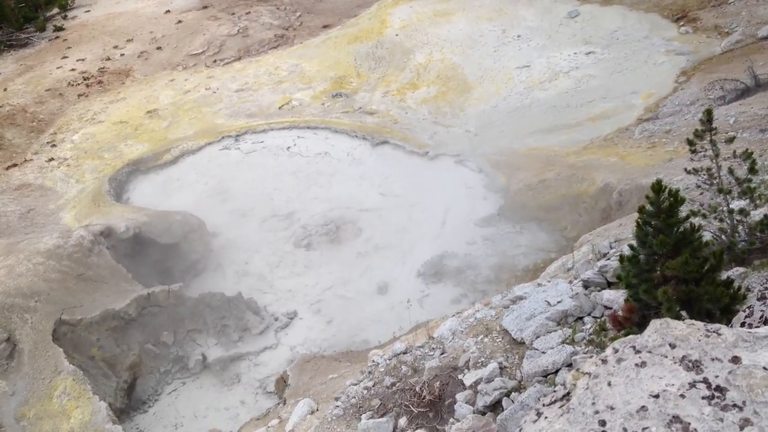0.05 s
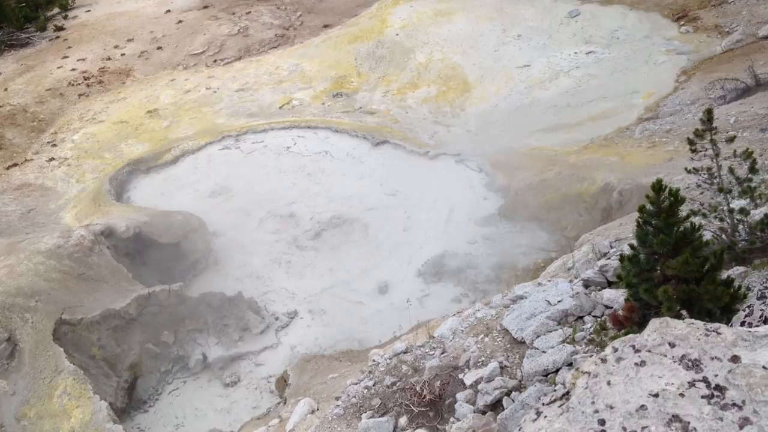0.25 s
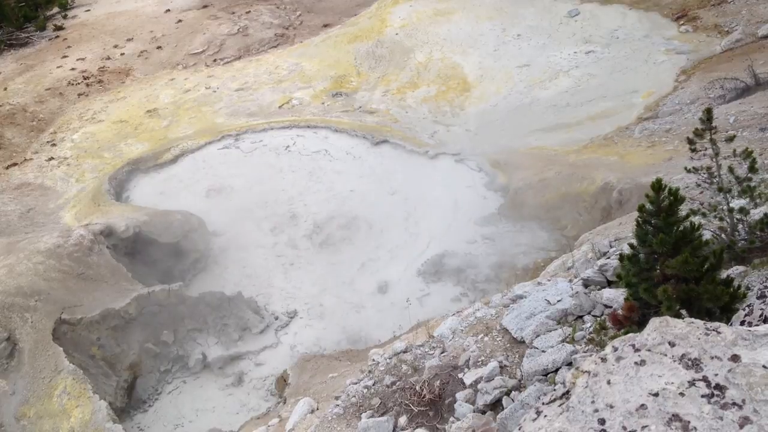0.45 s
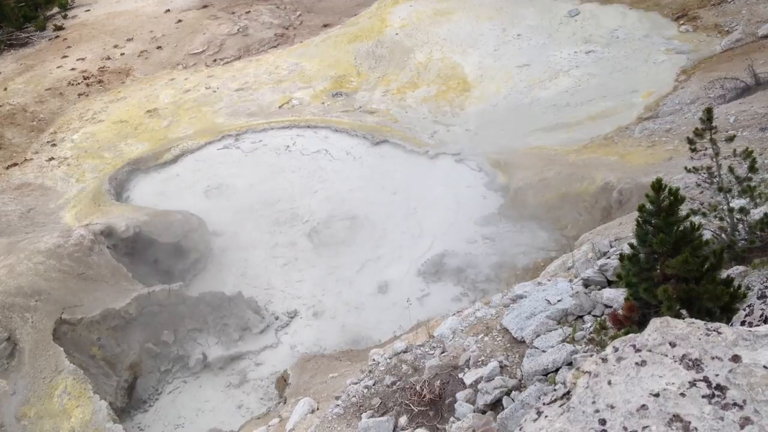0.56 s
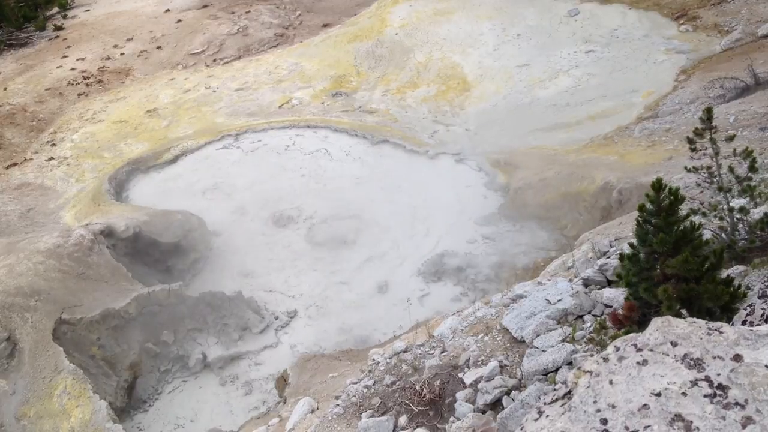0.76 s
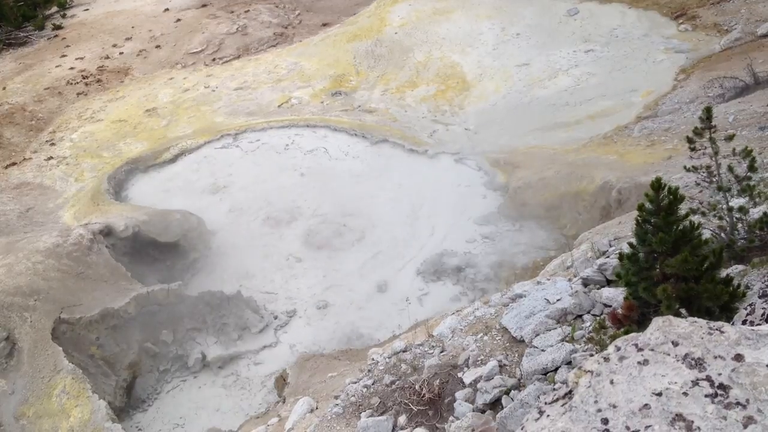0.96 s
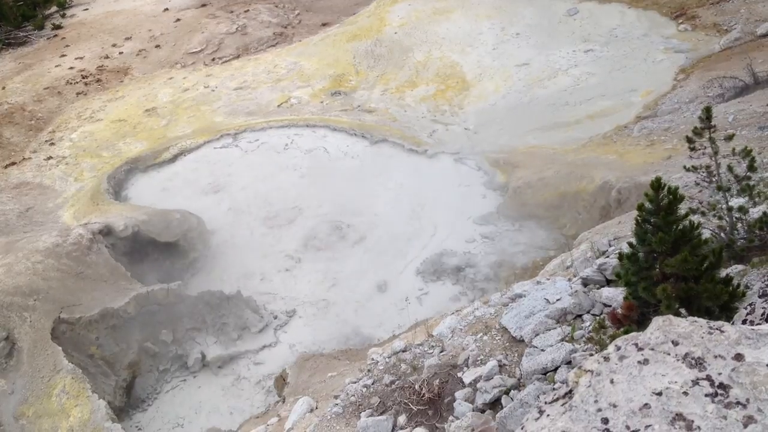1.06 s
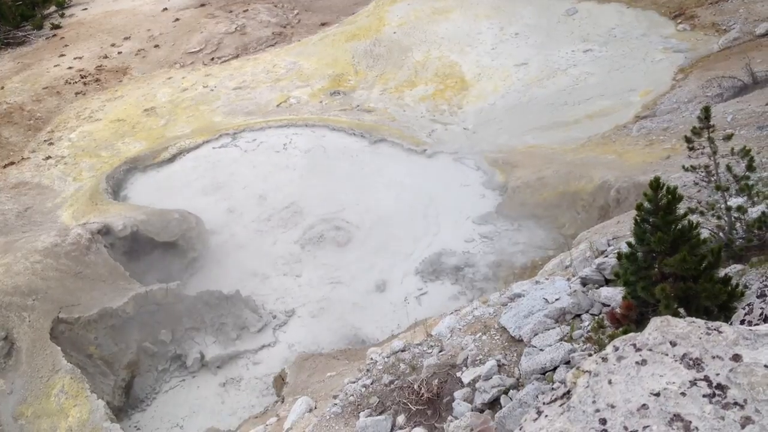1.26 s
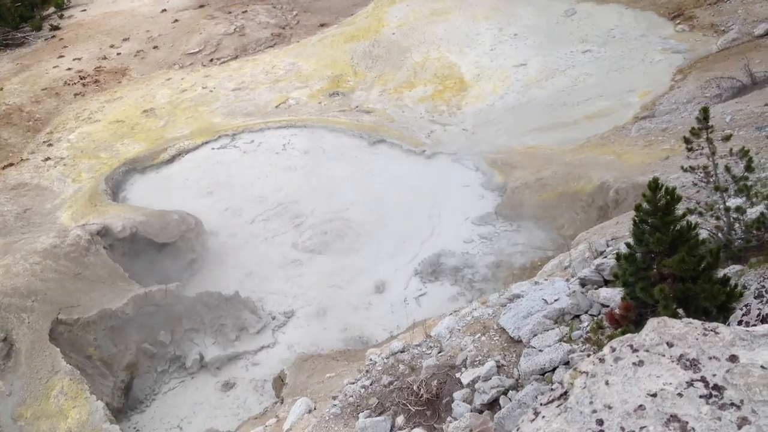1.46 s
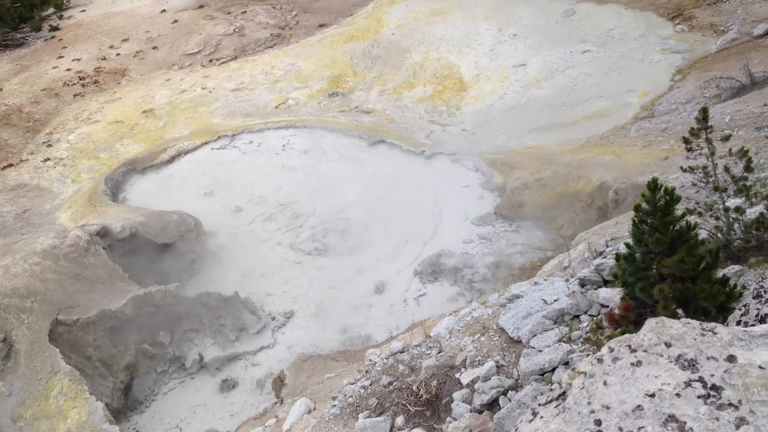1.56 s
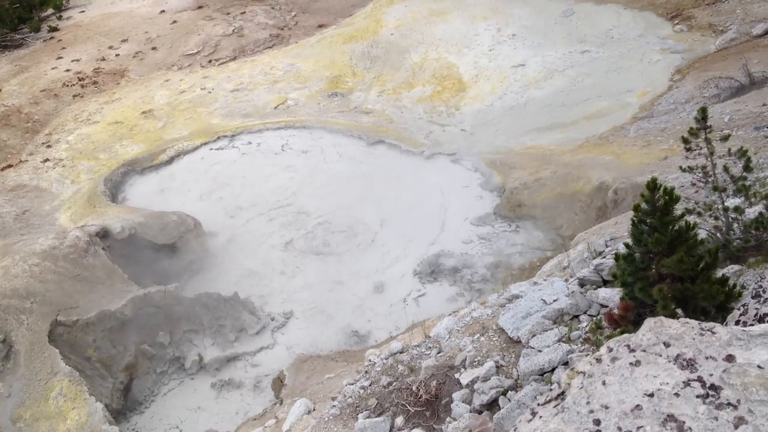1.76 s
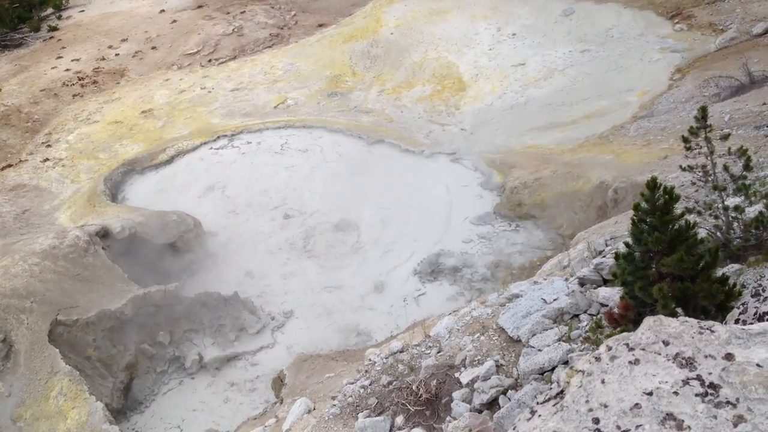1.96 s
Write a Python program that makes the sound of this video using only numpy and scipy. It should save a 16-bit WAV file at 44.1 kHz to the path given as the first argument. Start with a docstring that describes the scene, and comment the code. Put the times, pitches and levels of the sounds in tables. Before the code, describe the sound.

Low gulping and churning of a boiling mud pool, and one brief microphone bump.

```python
"""A muddy hot spring churns some way below a rim. Big gas bubbles gulp, each ringing briefly,
and hollows in the bank boom as the boiling rings them. The surface simmers evenly, with
churning water and small plops. The microphone is bumped once, with a faint rebound,
and its own hiss lies over the quiet scene."""
import sys
import numpy as np
from scipy import signal
from scipy.fft import irfft
from scipy.io import wavfile
from scipy.ndimage import uniform_filter1d

SR = 44100
rng = np.random.default_rng(int(sys.argv[2]) if len(sys.argv) > 2 else 0)


def unload_audio(sound):
    """Save the sound as a 16-bit wav file, at the path given as the first command line argument."""
    columns = np.transpose(np.atleast_2d(sound))
    # keep every value between -1 and 1, then stretch to whole-number steps
    steps = np.round(np.clip(columns, -1, 1) * 32767)
    wavfile.write(sys.argv[1], SR, steps.astype(np.int16))


N = 88200

# The tone of the microphone's hiss. Each row: frequency in Hz, relative level in dB.
HISS_TONE = [(100, -1.5), (2500, -0.5), (4000, 0), (6000, -2), (8000, -8), (9800, -16.5), (11500, -9),
             (13500, -0.5), (15300, -2)]
# A bump and its rebound. Each row: start in seconds, push in dB, brightness of the contact in Hz.
MIC_BUMPS = [(0.2029, -14.5, 530), (0.264, -27, 100)]
# The tone of churning water. Each row: frequency in Hz, relative level in dB.
CHURN_TONE = [(22, -37), (45, -32), (75, -11.5), (120, -2.5), (190, -1), (280, -1.5), (370, -8.5),
              (500, -10), (800, -15), (1300, -21), (2400, -31.5), (6000, -40.5)]
# The deep and the upper hollow. Each row: pitch in Hz, spread to either side in Hz, average level in dB.
BANK_HOLLOWS = [(171, 4.5, -65), (231.5, 10, -63)]
# How the booming swells. Each row: time in seconds, relative dB of the deep hollow, then of the upper.
HOLLOW_SWELLS = [(0, -2, -8.5), (.35, 2, -4), (.5, 0, -5.5), (.62, 1.5, 3.5), (.76, 1, -0.5), (.9, 1, 2),
                 (1.1, -3, -0.5), (1.28, 4.5, 5.5), (1.45, -6.5, 5.5), (1.59, 4.5, -7.5), (1.69, 3.5, 8.5),
                 (1.83, 4, -11), (2.0, -2.5, -7)]
# The loudest gulps. Each row: start in seconds, pitch in Hz, strength in dB.
LOUD_GULPS = [(0.282, 254, -50), (0.735, 174, -45.5), (0.796, 226, -43.5), (0.909, 269, -47),
              (1.282, 228, -51), (1.346, 282, -48), (1.513, 258, -44.5)]


def undb(db):
    """Turn decibels into a gain."""
    return 10 ** (np.asarray(db) / 20)


def level(x, db):
    """Set a sound's average (rms) level."""
    return x * undb(db) / np.sqrt(np.mean(x ** 2))


def frequencies():
    """The frequencies in Hz that make up the sound."""
    return np.maximum(np.arange(N // 2 + 1) * SR / N, 1)


def tone(points):
    """Join (Hz, dB) points into a gain for every frequency."""
    hz, db = np.array(points).T
    return undb(np.interp(np.log(frequencies()), np.log(hz), db))


def noise(gain):
    """Noise with the given gain at each frequency."""
    return irfft(gain * np.exp(2j * np.pi * rng.random(len(gain))), N)


def keep_side(x, hz, side, order):
    """Keep the "low" or "high" side of hz; a higher order cuts more steeply."""
    return signal.sosfilt(signal.butter(order, hz, side, fs=SR, output="sos"), x)


def wander(per_s):
    """A smooth random curve that typically strays by about 1."""
    hold = max(int(SR / per_s), 2)
    steps = rng.standard_normal(N)[np.arange(N) // hold]
    smooth = uniform_filter1d(uniform_filter1d(steps, hold), hold)
    return smooth / smooth.std()


def bubble(start, hz, cycles, rise):
    """A bubble swells, then fades as its pitch climbs by the share `rise`. Gives its place and sound."""
    at = np.arange(min(int(start * SR), N), min(int((start + cycles / hz) * SR), N))
    turns = np.arange(len(at)) * hz / SR
    loudness = np.minimum(turns, 1) * np.exp(-np.log(1000) * turns / cycles)  # fades by 60 dB
    return at, loudness * np.sin(2 * np.pi * turns * (1 + rise * turns / cycles / 2))


def bubbles(per_s, middle_hz, octaves, cycles, rise, scatter_db):
    """Bubbles of random size ring at random moments; the lower ones are louder."""
    out = np.zeros(N)
    starts = np.cumsum(rng.uniform(0, 2, size=2000)) / per_s
    chance = np.clip(rng.standard_normal(size=(2000, 2)), -2, 2)
    for start, (pitch, strength) in zip(starts, chance):
        if start * SR >= N:
            break
        hz = middle_hz * 2 ** (octaves * pitch)
        at, ring = bubble(start, hz, cycles, rise)
        out[at] += ring * undb(scatter_db * strength) * np.sqrt(middle_hz / hz)
    return out


def microphone_hiss():
    """The microphone makes its own steady hiss."""
    return level(noise(tone(HISS_TONE)), db=-76)


def microphone_bumps():
    """Each bump is one short push on the microphone, dulled by a soft contact."""
    push_s, swing_hz, bass_cut_hz, casing_hz = 0.0012, 137, 132, 2320
    out = np.zeros(N)
    for start, db, contact_hz in MIC_BUMPS:
        t = np.maximum(np.arange(N) / SR - start, 0)
        push = t / push_s * np.exp(1 - t / push_s) * np.cos(2 * np.pi * swing_hz * t)
        out -= undb(db) * keep_side(push, contact_hz, "low", order=1)
    thumps = keep_side(out, bass_cut_hz, "high", order=6)  # leaves a few cycles that fall in pitch
    return keep_side(thumps, casing_hz, "low", order=2)  # the casing carries little treble


def churning_water():
    """Churning water makes a rushing noise in which each octave flickers on its own."""
    flicker_db = 1.0
    octaves = np.log2(frequencies())
    out = np.zeros(N)
    for middle in range(4, 15):
        band = np.sqrt(np.maximum(1 - abs(octaves - middle), 0))
        out += noise(tone(CHURN_TONE) * band) * undb(flicker_db * wander(per_s=28))
    return level(out, db=-60.5)


def small_plops():
    """Small bubbles plop at the surface, each sliding up in pitch."""
    plops = bubbles(per_s=320, middle_hz=644, octaves=0.65, cycles=14, rise=0.29, scatter_db=1)
    return level(plops, db=-77)


def booming_hollows():
    """The boiling rings two hollows in the bank, which boom in turns, each at its own pitch."""
    times, *swells = np.array(HOLLOW_SWELLS).T
    out = np.zeros(N)
    for (hz, width, db), swell_db in zip(BANK_HOLLOWS, swells):
        ring = noise(1 / (1 + ((frequencies() - hz) / width) ** 2))
        swell = undb(np.interp(np.arange(N) / SR, times, swell_db))
        out += level(ring * swell, db)
    return out


def big_gulps():
    """Big gas bubbles ring low under the mud, and a few stand out from the crowd."""
    cycles, rise = 16.2, 0.024
    crowd = bubbles(per_s=75, middle_hz=219, octaves=0.33, cycles=cycles, rise=rise, scatter_db=0.5)
    out = level(crowd, db=-64)
    for start, hz, db in LOUD_GULPS:
        at, ring = bubble(start, hz, cycles, rise)
        out[at] += undb(db) * ring
    return out


def scene():
    """The spring, the bumps and the hiss, in one channel."""
    spring = big_gulps() + booming_hollows() + churning_water() + small_plops()
    return (spring + microphone_bumps() + microphone_hiss())[None]


def record(dry):
    """The recorder steeply cuts off the highest treble."""
    top_hz = 15400
    return signal.sosfilt(signal.ellip(12, .1, 70, top_hz, fs=SR, output="sos"), dry)


dry = scene()
out = record(dry)
unload_audio(out)
```